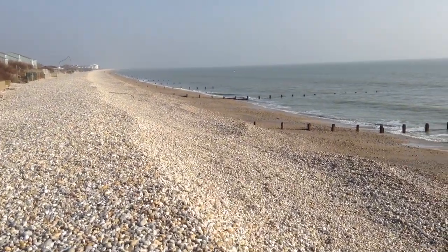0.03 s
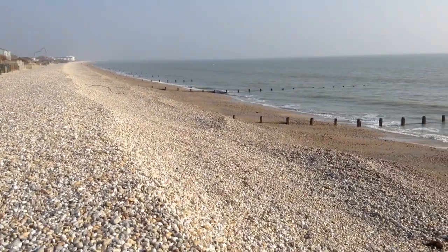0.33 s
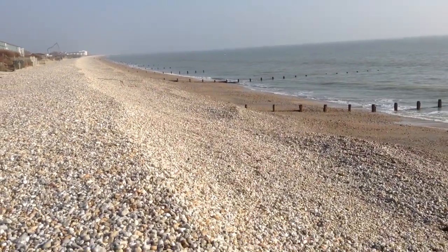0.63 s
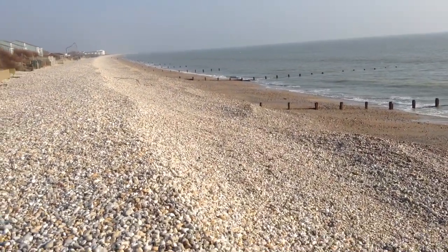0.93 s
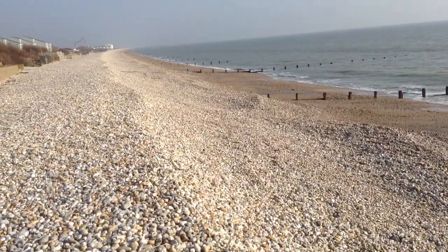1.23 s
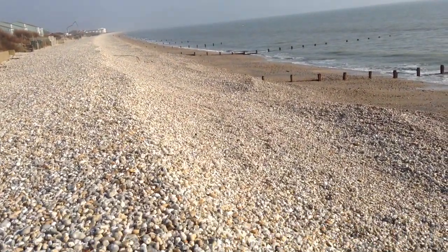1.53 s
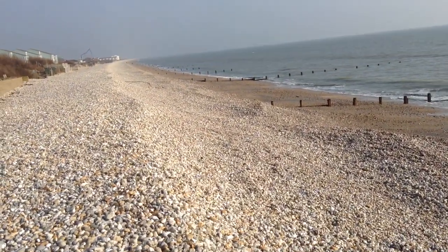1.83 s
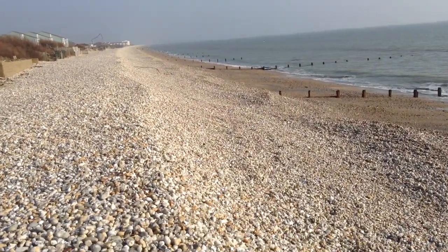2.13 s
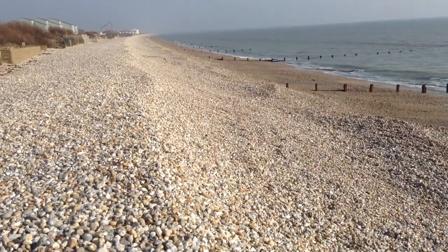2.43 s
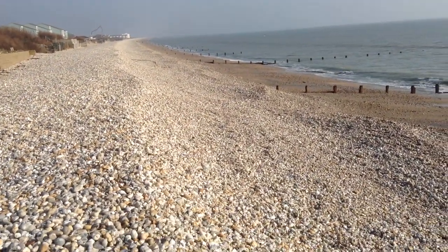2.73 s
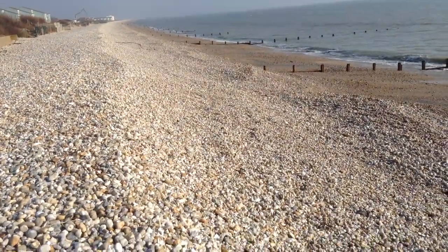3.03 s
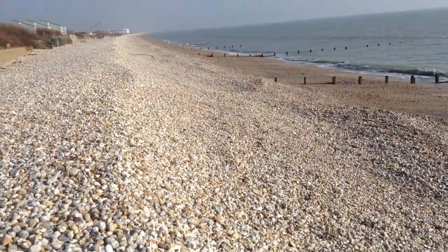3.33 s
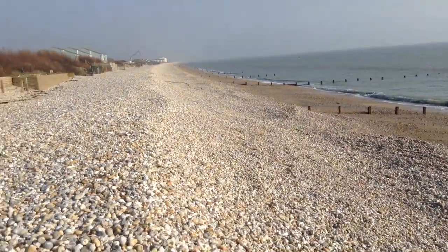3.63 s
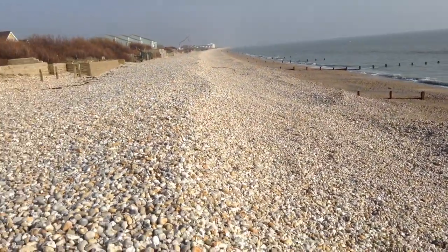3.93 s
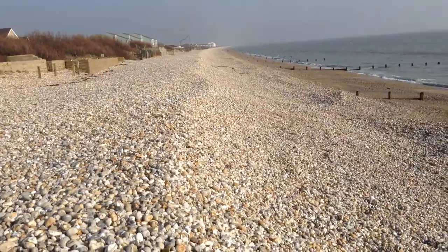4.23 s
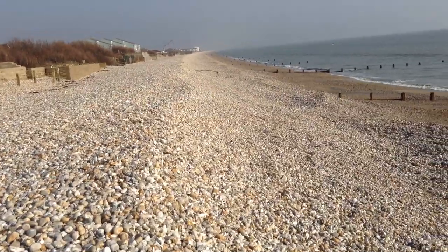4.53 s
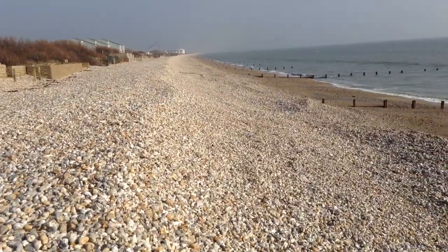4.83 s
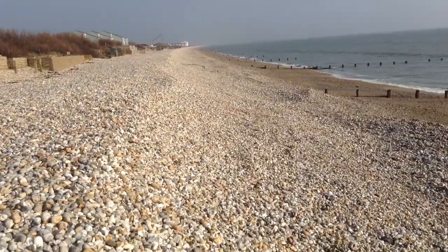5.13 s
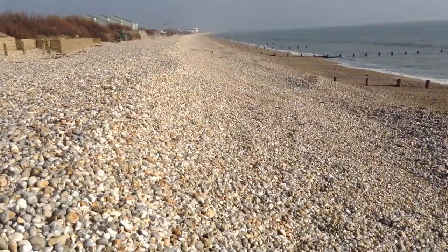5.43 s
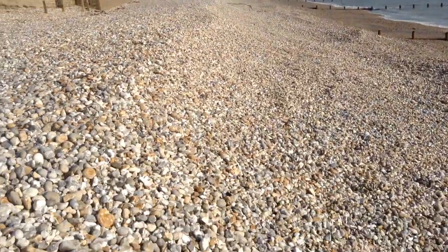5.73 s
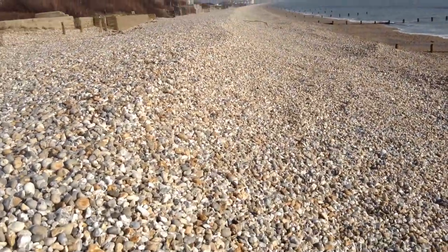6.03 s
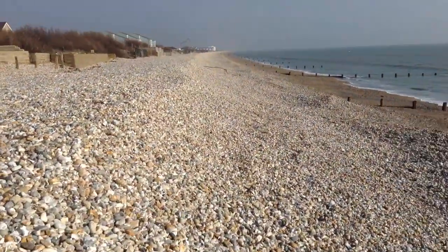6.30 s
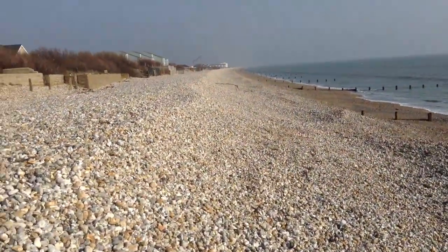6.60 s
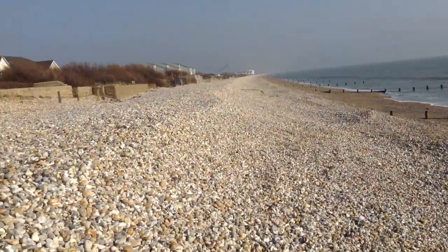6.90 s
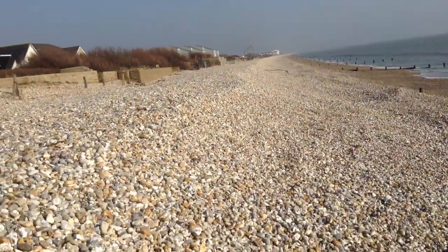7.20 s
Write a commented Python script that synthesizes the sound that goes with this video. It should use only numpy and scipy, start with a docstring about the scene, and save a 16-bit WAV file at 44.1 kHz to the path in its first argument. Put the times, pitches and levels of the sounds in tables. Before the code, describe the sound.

A gust of wind buffets a handheld microphone on a shingle bank by the sea. As it drops, footsteps begin crunching close below, light and separate at first, then heavier and longer. Kicked pebbles tumble and clack as they settle between steps. Small waves wash softly further down the shore, with a faint distant hum, a few tiny high chirps and occasional smaller wind thumps.

```python
"""Wind buffets a handheld microphone, hardest at the start, on a shingle bank by the sea.
Close below it someone walks: each step crushes the bed into a dense crunch of pebble collisions,
and kicked stones tumble and clack as they settle. Surf washes on the foreshore further down,
a faint drone hangs far off, and a few thin high chirps pass."""
import sys
import numpy as np
from scipy import signal
from scipy.fft import rfft, irfft, next_fast_len
from scipy.io import wavfile
from scipy.ndimage import uniform_filter1d, map_coordinates

SR = 44100
rng = np.random.default_rng(int(sys.argv[2]) if len(sys.argv) > 2 else 0)


def transcribe(signal):
    """Save signal, clipped to [-1, 1], as a 16-bit WAV file at the path in sys.argv[1]."""
    frames = np.atleast_2d(signal).T
    limited = np.clip(frames, -1, 1)
    pcm = np.round(limited * 32767).astype(np.int16)
    wavfile.write(sys.argv[1], SR, pcm)


N = 324576
TOP_HZ = 15400  # upper edge of the band
# spectrum of stone striking stone: frequency_hz, level_db
STONE_SPECTRUM = [(300, -38), (1200, -11), (2400, -4), (4200, 1), (5800, 1.5), (7400, -6.5), (9000, -8),
                  (15500, -29.5)]


def amp(db):
    """Decibels to gain."""
    return 10 ** (np.asarray(db) / 20)


def unit(x):
    """x at rms 1."""
    return x / np.sqrt(np.mean(x ** 2) + 1e-20)


def even(x, seconds):
    """x held near rms 1 over every stretch of the given length."""
    width = max(int(seconds * SR), 8)
    power = uniform_filter1d(uniform_filter1d(unit(x) ** 2, width), width)
    return x / np.sqrt(np.mean(x ** 2) * (np.abs(power) + 1e-3))


def wobble(per_s):
    """A smooth random curve through per_s knots a second."""
    knots = rng.standard_normal(int(N * per_s / SR) + 4)
    return map_coordinates(knots, [np.arange(N) * per_s / SR])


def colour(x, spectrum, size=4096):
    """x through a minimum-phase filter of unit power, shaped by rows of frequency_hz, level_db."""
    hz, db = np.transpose(spectrum)
    gain = amp(np.interp(np.log(np.fft.rfftfreq(size, 1 / SR) + 1), np.log(hz), db))
    cepstrum = irfft(np.log(np.maximum(gain, 1e-6)))
    cepstrum[1:size // 2] *= 2
    cepstrum[size // 2 + 1:] = 0
    response = irfft(np.exp(rfft(cepstrum)))
    return signal.fftconvolve(x, response / np.linalg.norm(response))[:len(x)]


def split(x, edge_hz, order):
    """The parts of x below and above an edge."""
    size = next_fast_len(len(x) + 2048)
    rolloff = 1 + (np.fft.rfftfreq(size, 1 / SR) / edge_hz) ** (2 * order)
    low = irfft(rfft(x, size) / rolloff, size)[:len(x)]
    return low, x - low


def add(track, start_s, sound):
    """Mix a sound into the track."""
    part = track[max(round(start_s * SR), 0):][:len(sound)]
    part += sound[:len(part)]


def scatter(onsets, grains):
    """A track with each grain starting at its onset sample."""
    places = onsets[:, None] + np.arange(grains.shape[1])
    return np.bincount(places.ravel(), grains.ravel(), N)[:N]


def swell(peak_s, level_db, rise_s, hold_s, t60_s):
    """Gain that climbs 20 dB per rise_s to its peak, holds, then dies away."""
    t = np.arange(N) / SR - peak_s
    early, late = np.maximum(-t, 0), np.maximum(t - hold_s, 0)
    return amp(np.maximum(level_db - 20 * early / rise_s - 60 * late / t60_s, -120))


def flurries(per_s=5, level_db=-31, spread_db=1.5):
    """Weak eddies that come by chance: rows of start_s, level_db."""
    onsets = np.flatnonzero(rng.random(N) < per_s / SR)
    return list(zip(onsets / SR, level_db + spread_db * rng.standard_normal(len(onsets))))


def wind():
    """Turbulence thumps right on the microphone; strong gusts break into brighter flaps."""
    # gusts: peak_s, level_db, rise_s, hold_s, t60_s
    gusts = [(0.153, -11, 0.02, 0.12, 0.55), (0.36, -14.5, 0.06, 0.13, 0.54),
             (6.594, -25.5, 0.11, 0.06, 0.27)]
    # the strongest eddies: start_s, level_db
    eddies = [(0.099, -11), (0.15, -2.5), (0.179, 0), (0.225, -4), (0.306, -1), (0.376, -8), (0.487, -13.5),
              (0.616, -5), (0.925, -15.5), (0.945, -17.5), (1.055, -22.5), (1.345, -23), (3.518, -14.5),
              (4.143, -18.5), (4.196, -12), (4.525, -19), (4.693, -10), (6.449, -13), (6.484, -12.5),
              (6.642, -7), (6.859, -15)]
    # spectra of the buffeting and of an eddy's puff: frequency_hz, level_db
    gust_spectrum = [(25, -58), (50, -37), (90, -19), (140, -4.5), (240, 0), (420, -6), (660, -11),
                     (1100, -25.5), (1600, -37.5), (2500, -69), (4000, -93)]
    puff_spectrum = [(25, -33), (70, -22), (120, -1), (220, 8), (330, -2.5), (500, -13.5), (900, -20),
                     (2000, -71)]
    breeze = amp(np.maximum(-33 - 4 * np.arange(N) / SR, -42.5))  # dies down to a lull
    gust = np.hypot(sum(swell(*row) for row in gusts), breeze) * amp(-2 + 1.85 * wobble(90))
    puffs, rise_s = np.zeros(N), 0.0088
    age = np.arange(SR // 5) / SR / rise_s
    for start_s, level_db in eddies + flurries():
        add(puffs, start_s, amp(level_db - 7.5) * (age * np.exp(1 - age)) ** 2)
    turbulence = even(colour(rng.standard_normal(N), gust_spectrum), seconds=0.034)
    dull, flap = split(turbulence, edge_hz=366, order=2)
    breaking = np.minimum(gust / 0.22, 1.2) * unit(amp(2 * wobble(199.5)))
    swirl = even(colour(rng.standard_normal(N), puff_spectrum), seconds=0.005)
    pressure = gust * (dull + breaking * flap) + puffs * swirl
    return split(pressure, edge_hz=78, order=3)[1]  # the slowest swings leak round the diaphragm


def port_slaps(swing_s=0.00014, relax_s=0.00038):
    """Wind slaps the microphone port: a steep swing from suction to push, relaxing on either side."""
    # slaps: centre_s, peak_db
    hits = [(0.1545, -9), (0.173, -9), (0.2018, -0.5), (.233, 0.5), (0.2473, -8), (.2645, -10), (.354, -10),
            (0.382, -0.5), (0.389, 0), (.493, -6), (4.703, -4.5)]
    # the port's response: frequency_hz, level_db
    port_response = [(25, -28), (100, -7), (300, 6.5), (800, 0.5), (1400, -1), (2300, -19), (4000, -71)]
    track, t = np.zeros(N), np.arange(-SR // 100, SR // 100) / SR
    swing = colour(np.tanh(t / swing_s) * np.exp(-np.abs(t) / relax_s), port_response)
    for centre_s, peak_db in hits:
        add(track, centre_s + t[0], amp(peak_db) * swing / np.abs(swing).max())
    return track


def footwork():
    """Level, brightness and looseness of the moving stones; the strongest movement leads."""
    # the shoe bears down on the bed: peak_s, level_db, rise_s, hold_s, t60_s, bright_db
    treads = [(0.99, -31, .04, 0.0097, .55, -25), (1.318, -19, .02, .012, 0.17, -18),
              (1.52, -32, .2, 0.044, 0.49, -20), (1.85, -17, 0.033, 0.016, .22, -16),
              (1.915, -17.5, 0.041, 0.033, .5, -17), (2.095, -20, .035, 0.014, 0.39, -16),
              (2.31, -25, 0.046, 0.0099, 0.24, -16), (2.44, -24, 0.057, .03, 0.55, -21),
              (2.53, -23.5, 0.02, 0.026, 0.71, -17), (2.63, -23, .06, 0.026, 0.33, -18),
              (2.715, -19, 0.011, .01, .45, -16.5), (2.935, -19, 0.053, 0.0071, 0.3, -17.5),
              (3.035, -18.5, 0.15, 0.019, 0.44, -14.5), (3.1, -12.5, 0.099, 0.028, 0.26, -12),
              (3.19, -25, 0.044, 0.012, 0.061, -11), (3.39, -11.5, 0.14, 0.032, 1.23, -8.5),
              (3.52, -16, 0.079, .04, 1.8, -6), (4.368, -14, 0.019, 0.011, 0.19, -11),
              (4.44, -18.5, 0.045, 0.2036, 0.47, -10.5), (4.82, -23.5, 0.098, .19, 1.5, -11.5),
              (5.2, -12.5, 0.063, .28, .5, -8), (6.068, -11, 0.041, 0.24, 0.87, -9),
              (7.17, -15.5, .22, .1, .9, -10)]
    # kicked pebbles tumble over the bank: peak_s, level_db, rise_s, hold_s, t60_s, bright_db
    spills = [(0.0, -40, .02, 0.08, 0.38, -14.5), (0.66, -37.5, .15, 0.072, 0.35, -17),
              (3.74, -21.5, .08, 0.11, 0.51, -15.5), (3.96, -24.5, .1, .1, 1.6, -11),
              (4.265, -24, .05, 0.012, .25, -16), (5.7, -19, 0.094, .1, 0.74, -6),
              (5.82, -22, 0.093, .1, .25, 2), (6.01, -22, 0.055, .04, 0.29, -2),
              (6.53, -21.5, .1, 0.21, .7, -10), (6.875, -21, 0.083, 0.036, 0.43, -3),
              (7.04, -17, 0.078, 0.22, 0.95, -7)]
    rest_loose, tread_loose, spill_loose = 0.7, 0.14, 0.78  # 0 = under full weight, 1 = tumbling
    rest_db, rest_bright_db = -51, -15  # the bed never quite settles
    power = np.full(N, amp(rest_db) ** 2)
    bright_sum, loose_sum = power * rest_bright_db, power * rest_loose
    for moves, loose in ((treads, tread_loose), (spills, spill_loose)):
        for *shape, bright_db in moves:
            share = swell(*shape) ** 2
            power += share
            bright_sum += share * bright_db
            loose_sum += share * loose
    shift_db = 1.23 * wobble(24)  # the load shifts unevenly from stone to stone
    return 10 * np.log10(power) + shift_db, bright_sum / power, np.clip(loose_sum / power, 0, 1)


def pebbles(t60_s, count, modes=10):
    """Contacts of unit energy, each from heavily damped modes of a stone and the gaps round it."""
    t = np.arange(SR // 200) / SR
    hz = rng.uniform(300, TOP_HZ, (count, modes, 1))
    mode_t60_s = t60_s * np.exp(0.5 * rng.standard_normal(hz.shape))
    envelopes = rng.standard_normal(hz.shape) * amp(-60 * t / mode_t60_s)
    rings = (envelopes * np.cos(2 * np.pi * hz * t)).sum(1)
    return rings / np.linalg.norm(rings, axis=1, keepdims=True)


def collisions(per_s, spread_db, t60_s):
    """Pebbles knock together at random moments, their levels scattered by spread_db."""
    onsets = np.flatnonzero(rng.random(N) < np.minimum(per_s / SR, 0.2))
    stones = pebbles(t60_s, count=400)
    sizes = amp(spread_db * np.clip(rng.standard_normal(len(onsets)), -2, 2))
    return scatter(onsets, sizes[:, None] * stones[rng.integers(len(stones), size=len(onsets))])


def clinks(per_s, centre_hz, t60_s):
    """Flints that are free to ring do so briefly, each at its own pitch."""
    onsets = np.flatnonzero(rng.random(N) < per_s / SR)
    pitch, size = rng.standard_normal((len(onsets), 2)).T[:, :, None]
    t = np.arange(SR // 50) / SR
    hz = np.minimum(centre_hz * np.exp(0.42 * pitch), TOP_HZ)
    envelopes = amp(2.3 * np.clip(size, -2, 2) - 60 * t / t60_s)
    return scatter(onsets, envelopes * np.sin(2 * np.pi * hz * t))


def shifting_resonances(x, depth_db=1.2, width_hz=300, life_s=0.035):
    """The shoe keeps meeting other stones, each group with its own resonances."""
    hz, t, spectra = signal.stft(x, SR, nperseg=512)
    bins, frames = max(round(width_hz / hz[1]), 1), max(round(life_s / t[1]), 1)
    patches = rng.standard_normal(spectra.shape)
    for _ in range(2):
        patches = uniform_filter1d(uniform_filter1d(patches, bins, axis=0), frames, axis=1)
    return signal.istft(spectra * amp(depth_db * unit(patches)), SR, nperseg=512)[1][:N]


def crunch(level_db, bright_db, loose):
    """Weight on the bed makes dense, deep collisions; loose stones are sparse, clumped and thin."""
    # spectrum of the shingle underfoot: frequency_hz, level_db
    bed_spectrum = [(180, -33), (330, -7), (650, -15.5), (1250, -8.5), (1800, -5), (2400, -1.5), (3200, -1),
                    (4000, 1.5), (5700, -2.05), (6700, -9.5), (7500, -14), (8700, -15.5), (11000, -22.5),
                    (15500, -36)]
    clumps = amp((-0.04 + 2.3 * loose) * wobble(240) + (2 + 2 * loose) * wobble(70))
    surface = collisions(per_s=6000 * amp(-15 * loose), spread_db=0, t60_s=0.0033) * clumps
    buried = amp(-7) * collisions(per_s=5000, spread_db=5, t60_s=0.003)  # stones further down
    ringing = amp(-11) * unit(clinks(per_s=500, centre_hz=4600, t60_s=0.028))
    grit = shifting_resonances(even(surface, seconds=0.04) + buried + ringing)
    bed = even(colour(grit, bed_spectrum), seconds=0.026)
    body, treble = split(bed, edge_hz=6097, order=5)
    bass, middle = split(body, edge_hz=1506.7, order=2)
    body = middle + bass * amp(4 - 6.8 * loose)
    tick, glint = split(treble, edge_hz=11200, order=3)
    treble = tick + glint * amp(0.51 * bright_db + 3)  # harder contacts reach higher still
    return amp(level_db - 1.3) * (unit(body) + amp(bright_db + 4) * unit(treble) + thud(loose))


def thud(loose):
    """The ground takes the weight with a low rumble, weaker where the stones are loose."""
    # spectrum of the loaded ground: frequency_hz, level_db
    ground_spectrum = [(25, -30), (60, -21), (110, 6), (250, 17), (600, -43), (1500, -59)]
    return amp(-29 - 3.7 * loose) * unit(colour(rng.standard_normal(N), ground_spectrum))


def surf(rise_db_per_s=12.5, fall_db_per_s=7.5, calm_db=-41.5):
    """Small waves build and ebb down on the foreshore; their roar and fizz waver separately."""
    # waves washing in: crest_s, level_db
    waves = [(2.8, -35.5), (3.8, -33), (4.95, -27.5), (6.5, -35.5)]
    # spectrum of the wash: frequency_hz, level_db
    sea_spectrum = [(25, -34), (55, -19.5), (100, -16.5), (165, -3.5), (260, -4), (500, -7), (900, -7.5),
                    (2000, -9.5), (4500, -19.5), (8000, -31), (15000, -40)]
    t = np.arange(N) / SR
    surges = [amp(level_db - np.maximum(rise_db_per_s * (crest_s - t), fall_db_per_s * (t - crest_s)))
              for crest_s, level_db in waves]
    wash = np.sqrt(amp(calm_db) ** 2 + np.sum(np.square(surges), axis=0))
    roar, fizz = split(unit(colour(rng.standard_normal(N), sea_spectrum)), edge_hz=440, order=2)
    return wash * (roar * amp(1 + 0.87 * wobble(22)) + fizz * amp(2 + 2.04 * wobble(19)))


def drone(waver_db=2):
    """A faint hum from far away, wavering in level and pitch."""
    # tones of the hum: pitch_hz, level_db
    tones = [(177, -45), (300, -51), (1990, -55)]
    track, t = np.zeros(N), np.arange(N) / SR
    for hz, level_db in tones:
        gain = amp(level_db + waver_db * wobble(5))
        track += gain * np.sin(2 * np.pi * hz * t + np.sqrt(hz / 700) * wobble(11))
    return track


def strays(level_db, bright_db, loose, loose_per_s=22, ceiling_db=-17.5, rattle=0.38):
    """Lesser strikes, more frequent on looser stones: rows of start_s, level_db, bright_db, rattle."""
    onsets = np.flatnonzero(rng.random(N) < loose_per_s * loose / SR)
    size, tone = rng.standard_normal((len(onsets), 2)).T
    strike_db = np.minimum(level_db[onsets] + 3.5 + 4.5 * size, ceiling_db)
    return list(zip(onsets / SR, strike_db, bright_db[onsets] + 4 * tone, np.full(len(onsets), rattle)))


def clacks(lesser_strikes, graze_s=0.004, graze_db=-12, rattle_t60_s=0.07):
    """One stone grazes and strikes another, rebounds, and rattles its neighbours."""
    # the hardest single strikes: start_s, level_db, bright_db, rattle (0-1)
    strikes = [(0.0983, -35.5, -5, .6), (0.504, -30.5, -16, 0.7), (0.516, -23, -11, 0.17),
               (0.5307, -25.5, -15, 0.3), (0.578, -29.5, -31, .1), (0.6158, -31, -33, 0.6),
               (0.9892, -26.5, -29, 0.15), (1.2855, -15.5, -15, .7), (1.8322, -17, -7, 0.6),
               (1.9182, -16.5, -9, 0.5), (2.0956, -13, -12, 0.4), (2.315, -27, -7, 0.14),
               (2.405, -20.5, -5, 0.46), (2.651, -18.5, -19, 0.44), (2.7105, -13, -22, .7),
               (3.1854, -15, -6.5, 0.4), (3.2664, -16.5, -11, 0.1), (3.2934, -14, -2, .6),
               (3.7771, -16, -11, 0.4), (4.1195, -15, -4, 0), (4.1974, -18, -12, 0.17),
               (4.2669, -15, -13, 0.4), (4.2912, -17.5, -8, .2), (4.3334, -10.5, -18, 0.16),
               (4.3599, -12.5, -15, .2), (4.414, -12, -36, 0.17), (4.4356, -12.5, -16, 0.7),
               (4.7495, -21.5, -20, .05), (4.7724, -16, -7, .3), (5.4021, -14, -9, .6),
               (5.6861, -15, -19, 0.9), (5.7459, -13, -9, 0.16), (5.8593, -13, 21, 0.2),
               (5.8936, -9.5, 9, .7), (5.9698, -12, -2, 0.31), (5.9827, -10.5, -4, 0.46),
               (6.01, -12.5, 5, 0.2), (6.0322, -11.5, -1, 0.4), (6.5761, -14, -19, 0.3),
               (6.7373, -15, -4, 0.4), (6.8146, -16.5, -18, 0.5), (6.9464, -13, -22, 0.08),
               (7.0699, -13.5, -7, 0.5), (7.3232, -10, -16, 0.9)]
    track, t = np.zeros(N), np.arange(SR // 20) / SR
    for start_s, level_db, bright_db, rattle in strikes + lesser_strikes:
        hit = rattle * amp(-9 - 60 * t / rattle_t60_s) * rng.standard_normal(len(t))
        impact, rebound = pebbles(t60_s=0.0016, count=2, modes=30)
        add(hit, 0, impact)
        add(hit, rng.uniform(0.00034, 0.0018), 0.77 * rebound)
        low, high = split(colour(hit, STONE_SPECTRUM), edge_hz=6050, order=3)
        hit = unit(low) + unit(high) * amp(bright_db - 1)
        add(track, start_s, amp(level_db) * hit / np.std(hit[:SR // 200]))  # rms of the first 5 ms
        graze = unit(colour(rng.standard_normal(round(graze_s * SR)), STONE_SPECTRUM))
        add(track, start_s - graze_s, amp(level_db + graze_db) * graze * np.linspace(0, 1, len(graze)))
    return track


def chirps():
    """Short, high, gliding whistles."""
    # thin chirps: start_s, length_s, start_hz, end_hz, level_db
    glides = [(0.677, .016, 6860, 7500, -29.5), (1.779, 0.013, 8510, 8300, -34),
              (2.626, 0.019, 8110, 7400, -22), (2.648, 0.01, 7170, 6200, -14.5),
              (2.807, 0.023, 7090, 6700, -26), (6.782, 0.012, 10250, 8220, -13),
              (6.787, 0.017, 8800, 8470, -18)]
    track = np.zeros(N)
    for start_s, length_s, start_hz, end_hz, level_db in glides:
        hz = np.linspace(start_hz, end_hz, int(length_s * SR))
        whistle = np.sin(2 * np.pi * np.cumsum(hz) / SR)
        add(track, start_s, amp(level_db) * np.hanning(len(hz)) * whistle)
    return track


def slips(attack_s=0.002, t60_s=0.13):
    """The bed gives way under the shoe: a cascade of contacts that dies as the stones lock again."""
    # collapses of the bed: start_s, level_db
    collapses = [(1.281, -6), (1.3116, -10), (1.8477, -6), (2.0951, -15), (2.4404, -14), (2.7093, -14),
                 (3.0934, -2.5), (3.294, 1.5), (3.3899, -6), (3.533, -3), (4.413, -4), (4.555, 2.5),
                 (5.1938, 5), (5.3, 5.5), (5.9053, 1.5), (6.0614, 4), (6.3064, -4), (6.871, 2), (7.2569, 1)]
    force, t = np.zeros(N), np.arange(SR // 4) / SR
    for start_s, level_db in collapses:
        add(force, start_s, amp(level_db - 10 - 60 * t / t60_s) * (1 - np.exp(-t / attack_s)))
    contacts = collisions(per_s=3500, spread_db=4, t60_s=0.003)
    return force * even(colour(contacts, STONE_SPECTRUM), seconds=0.0057)


def scene():
    """One microphone on the bank: wind right on it, feet close below, the sea further down."""
    movement = footwork()
    feet = crunch(*movement) + slips() + clacks(strays(*movement))
    return (feet + wind() + port_slaps() + surf() + drone() + chirps())[None]


def record(dry, low_cut_hz=58):
    """The microphone sheds deep bass, the loudest peaks are rounded, and nothing passes TOP_HZ."""
    thin = signal.sosfilt(signal.butter(3, low_cut_hz, "highpass", fs=SR, output="sos"), dry)
    rounded = thin / (1 + np.abs(thin) ** 8) ** (1 / 8)
    size = next_fast_len(N + SR // 2)
    in_band = np.fft.rfftfreq(size, 1 / SR) < TOP_HZ
    return irfft(rfft(rounded, size) * in_band, size)[:, :N]


dry = scene()
out = record(dry)
transcribe(out)
```